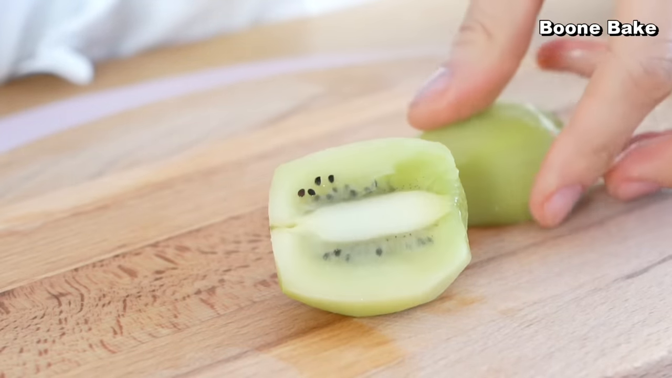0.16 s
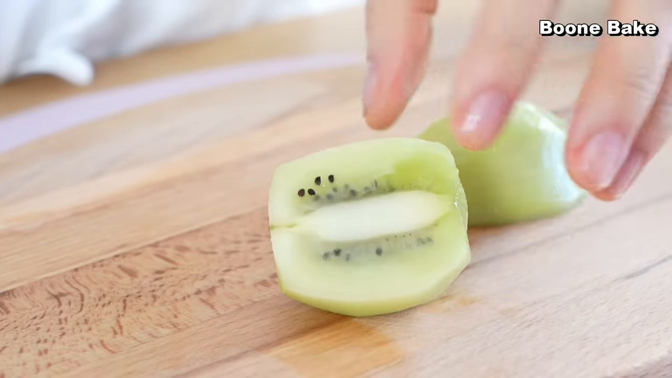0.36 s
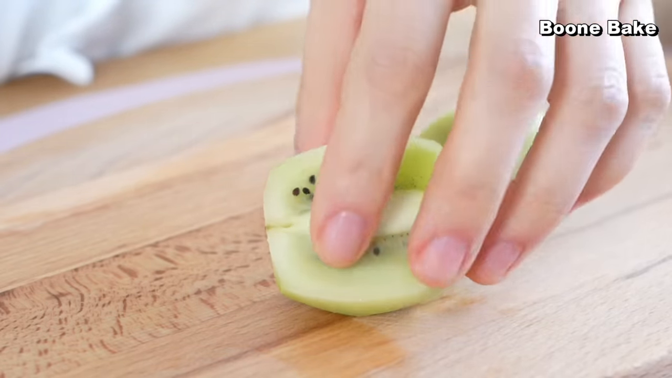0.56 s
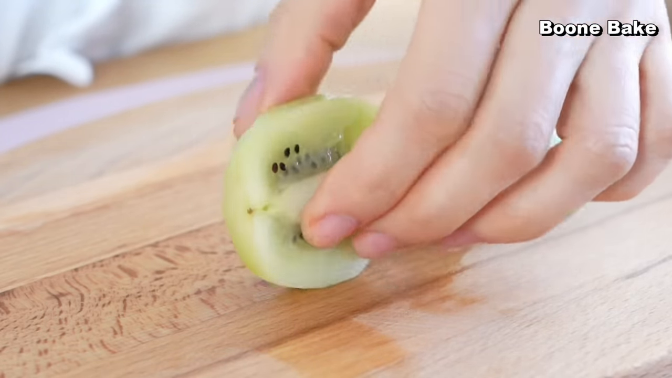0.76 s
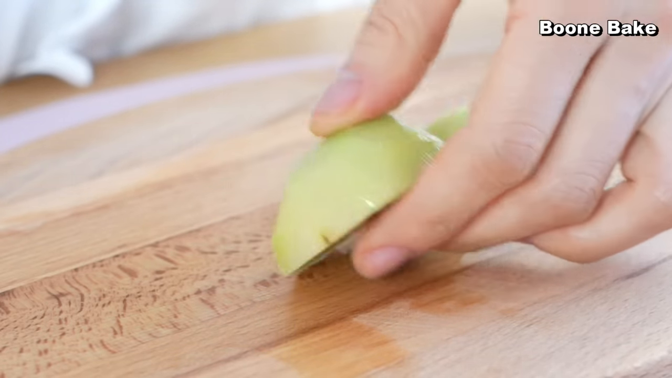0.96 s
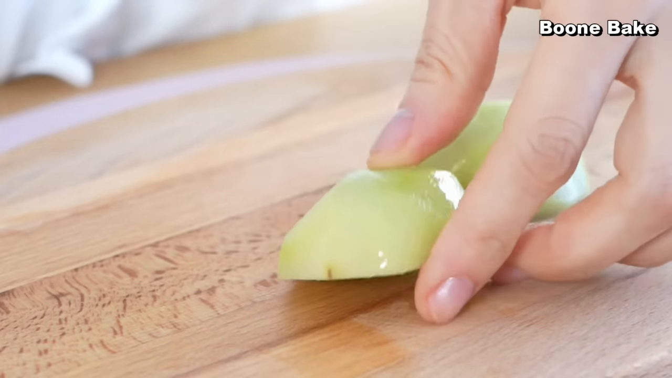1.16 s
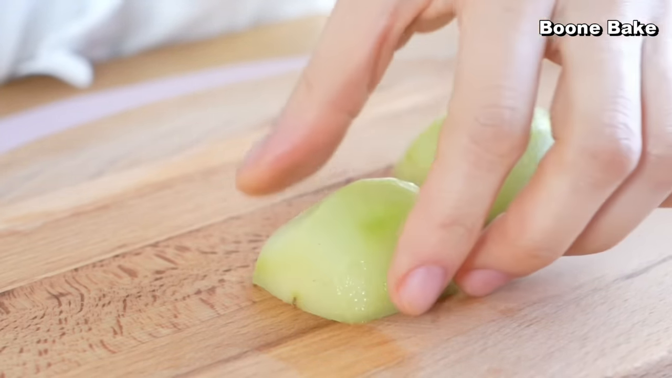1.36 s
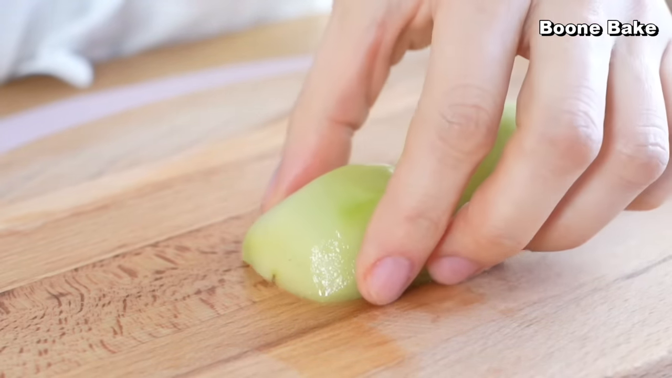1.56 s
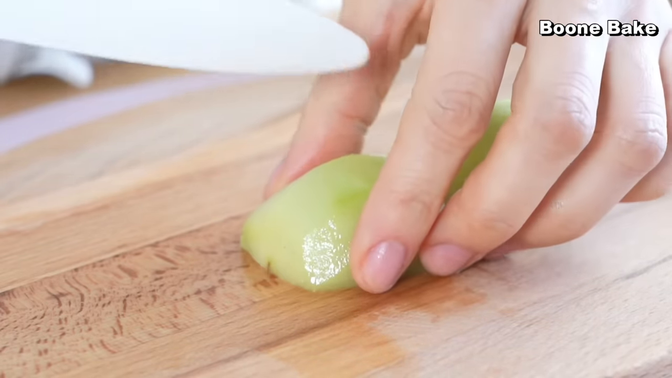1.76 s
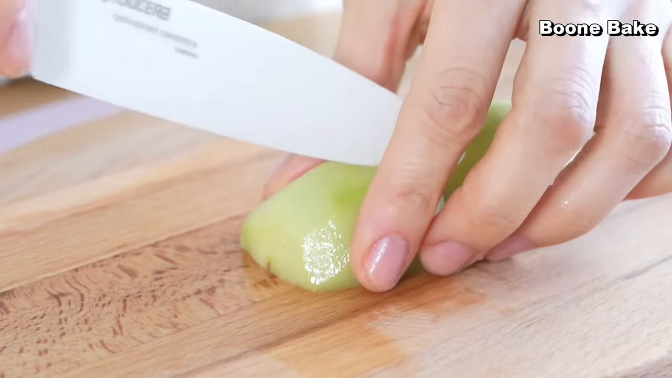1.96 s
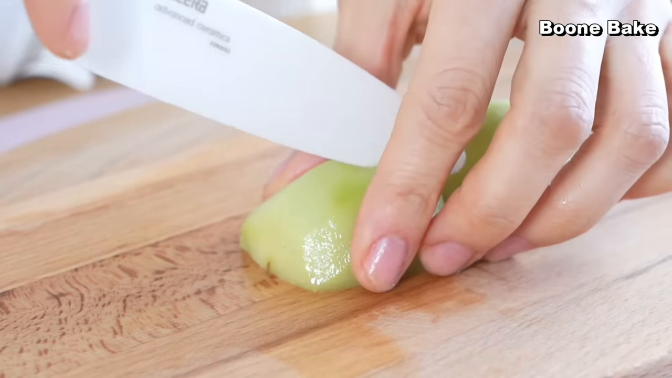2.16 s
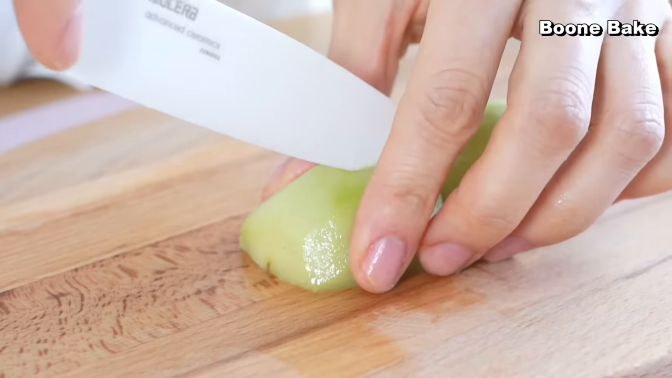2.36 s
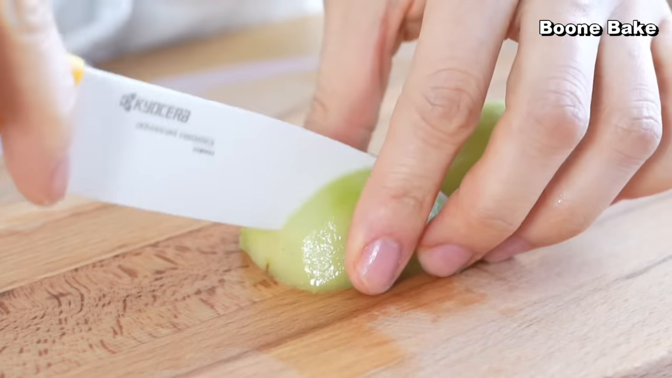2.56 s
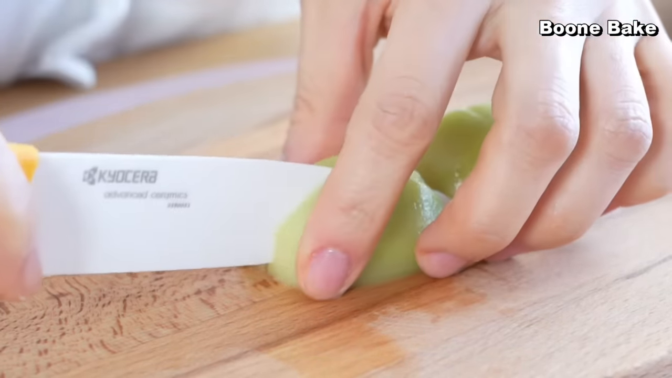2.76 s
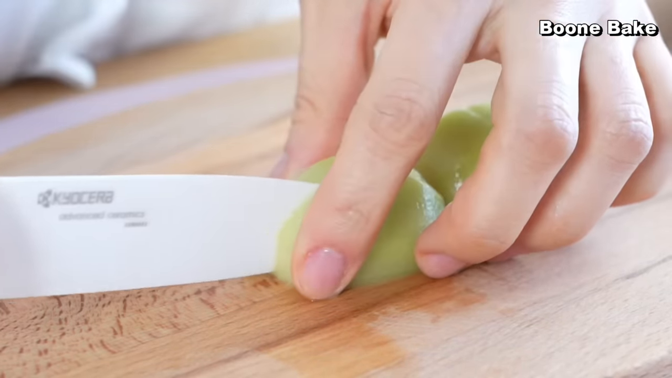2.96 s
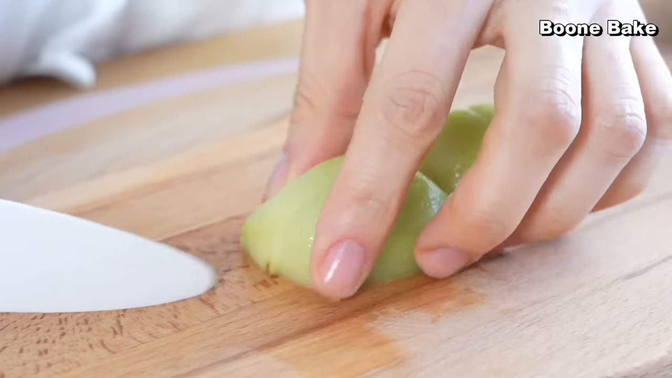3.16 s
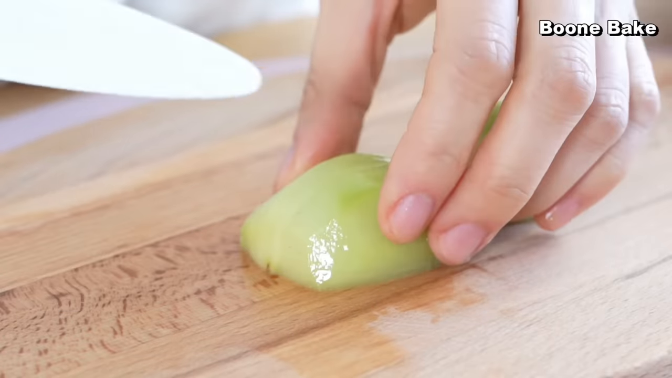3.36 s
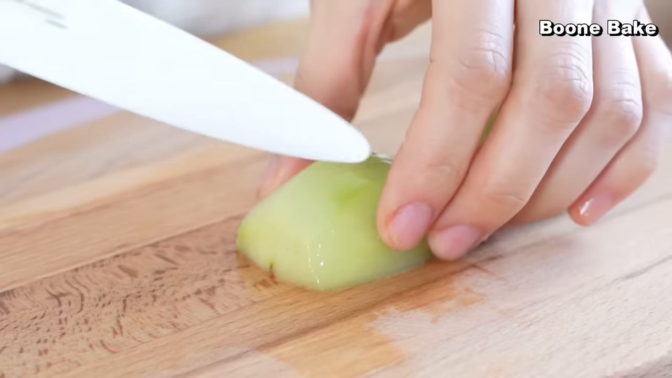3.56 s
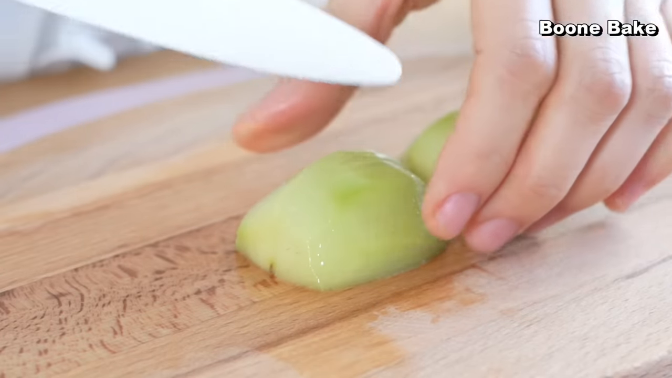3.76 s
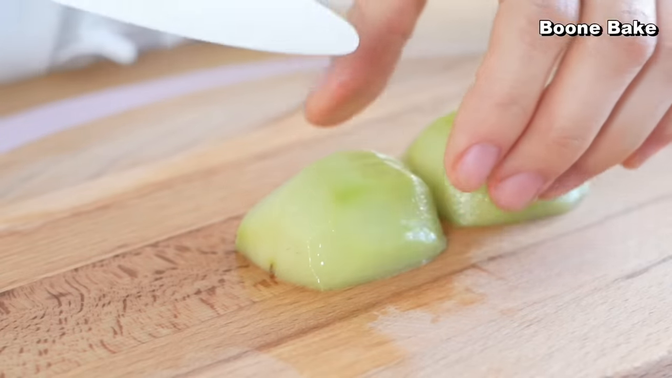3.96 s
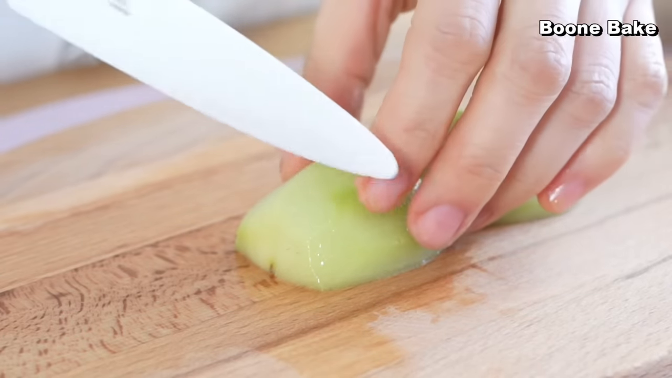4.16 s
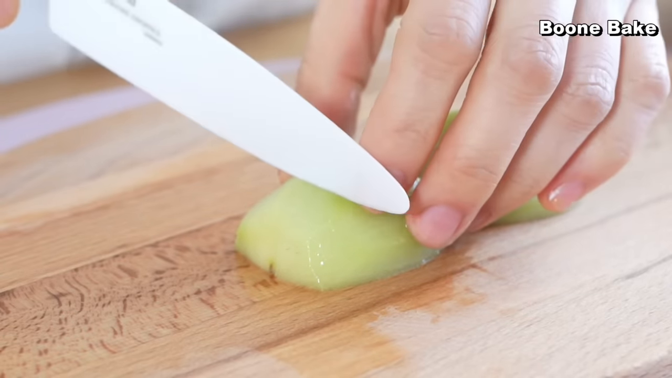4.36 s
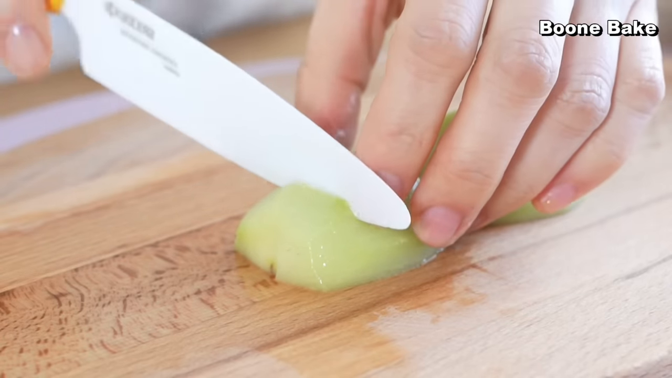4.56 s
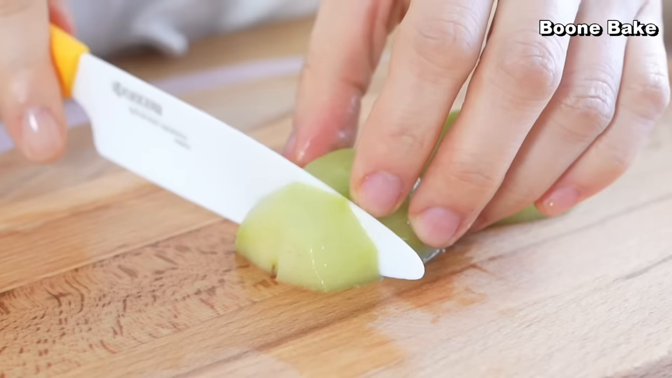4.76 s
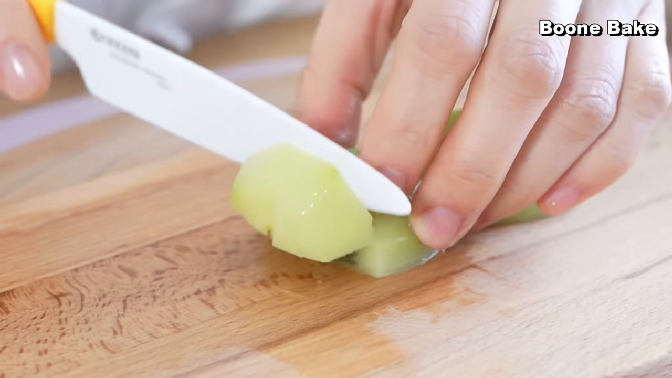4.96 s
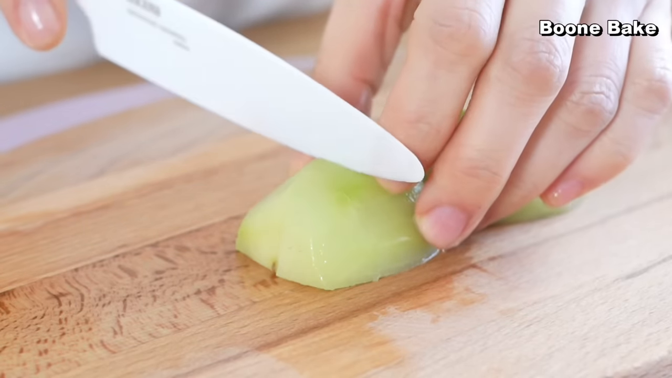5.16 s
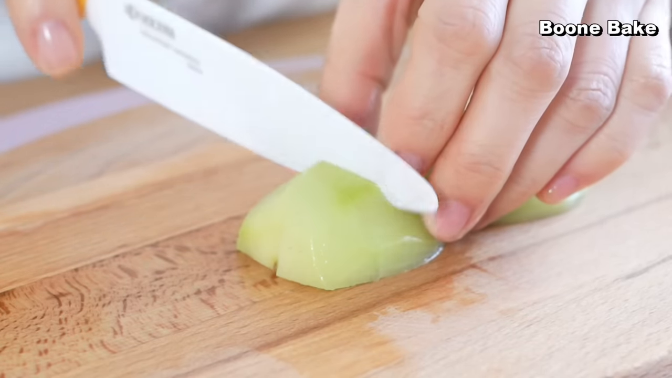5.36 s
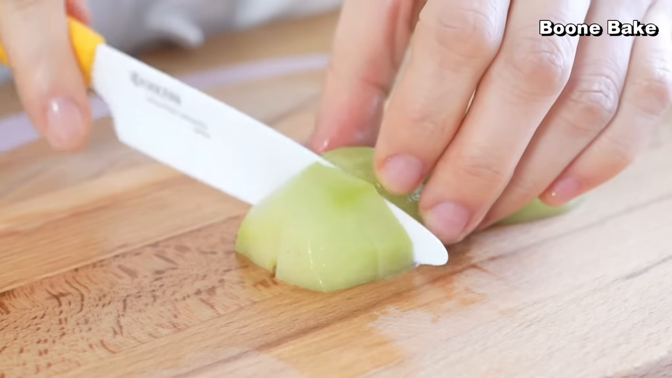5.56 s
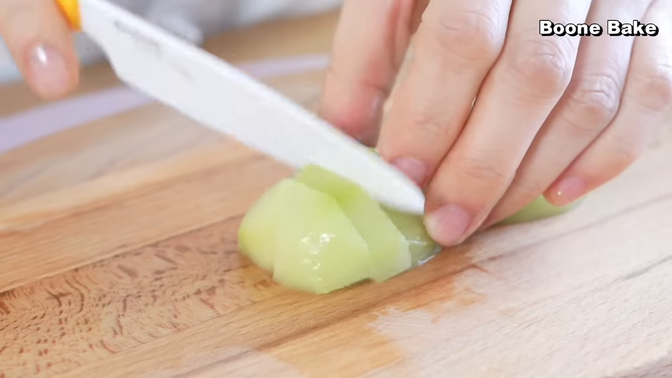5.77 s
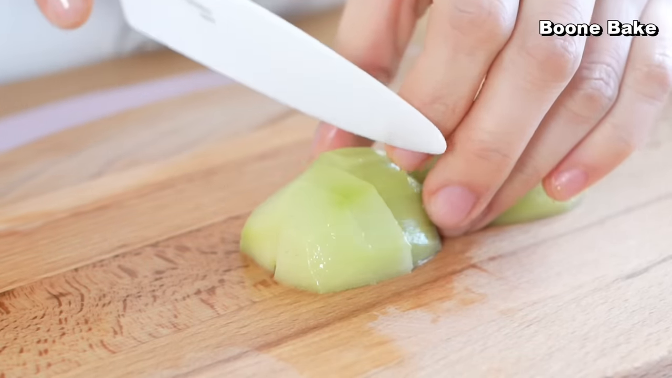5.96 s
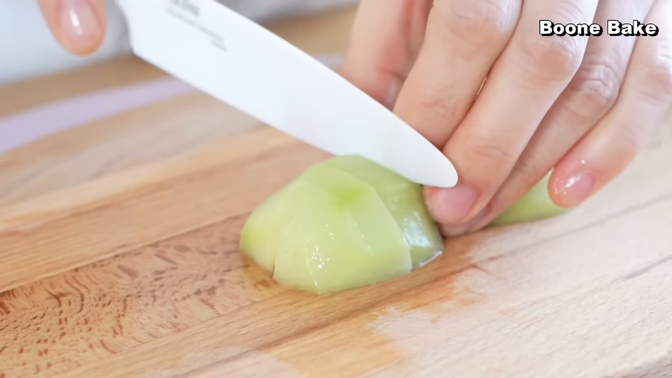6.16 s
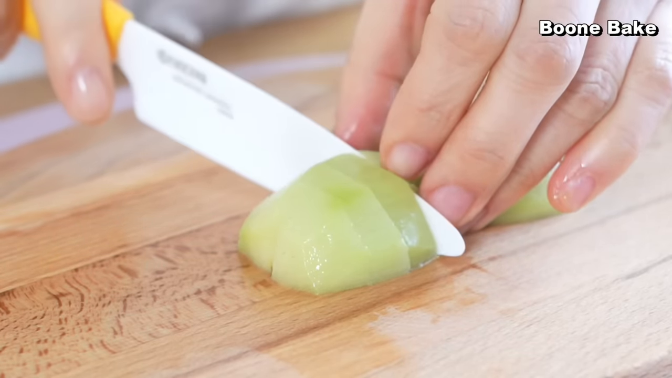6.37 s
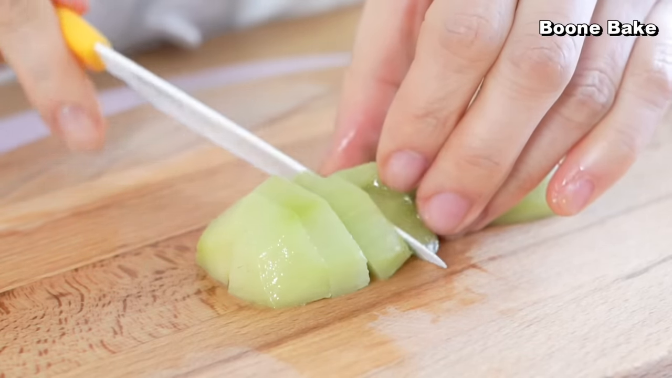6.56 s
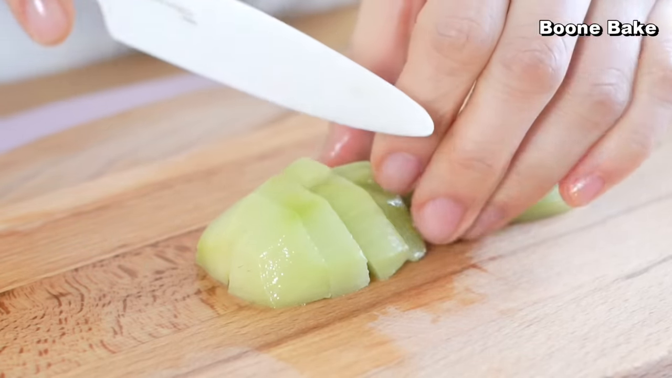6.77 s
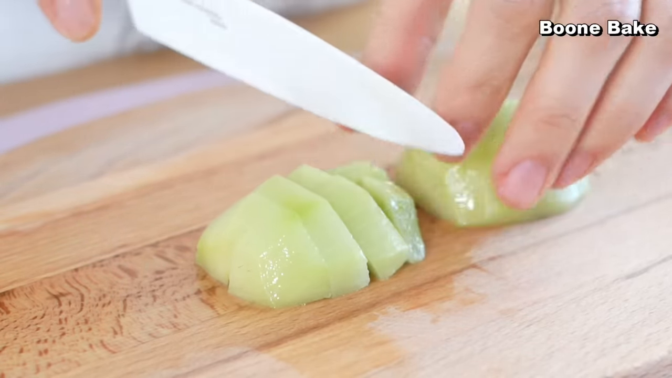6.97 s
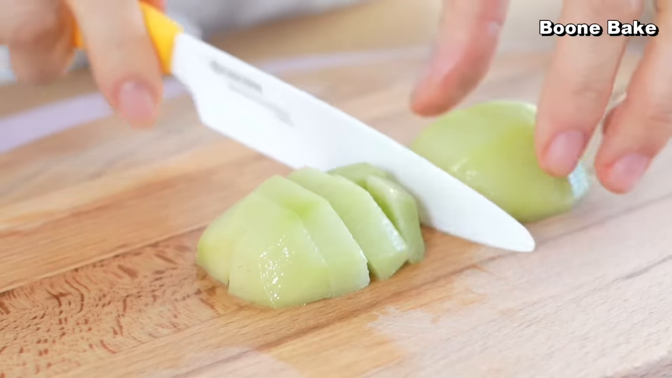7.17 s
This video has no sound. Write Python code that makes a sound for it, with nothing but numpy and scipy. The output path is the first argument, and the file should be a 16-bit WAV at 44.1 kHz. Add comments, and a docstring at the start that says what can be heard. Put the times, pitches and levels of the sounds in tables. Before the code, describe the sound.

In a quiet kitchen with a slight echo, fingers rub a peeled kiwi and two pieces flop onto a wooden board with small sticky clicks. A ceramic knife crunches through the flesh and knocks on the wood, then drags out with a rasp and a squeak. Three more cuts follow, each ending in a sharp knock and a brief chatter of the blade. One last knock comes at the end.

```python
"""In a quiet kitchen with a slight echo, fingers rub a peeled kiwi and two pieces flop onto a wooden board,
with clicks of juice and a faint squeak. At 2.5 s a ceramic knife crunches through the flesh, knocks on the
board and sets the table swaying. The blade is then dragged out along the wood, rasping and squeaking. Three
more cuts follow (4.7, 5.5 and 6.4 s); after each, the blade chatters as it lifts off the board. Near the end
the background noise suddenly drops."""
import sys
import numpy as np
from scipy import signal
from scipy.fft import rfft, irfft
from scipy.io import wavfile
from scipy.ndimage import uniform_filter1d

SR = 44100
rng = np.random.default_rng(int(sys.argv[2]) if len(sys.argv) > 2 else 0)


def transcribe(u):
    """Save the signal u as a 16-bit wav file named by the first command-line argument.

    u: samples, shape (n,) or (channels, n), limited to [-1, 1]; the rate is SR.
    q: integer samples, one column per channel.
    """
    v = np.clip(np.atleast_2d(u).T, -1, 1)
    q = np.round(v * 32767).astype(np.int16)
    wavfile.write(sys.argv[1], SR, q)


N = 318402
TIME = np.arange(N) / SR

# A TONE table says how strong each pitch is next to the others. ring_s is the time to fade by 60 dB.
# room noise: pitch_hz, level_db
ROOM_TONE = [(12, -18.5), (20, 3.5), (32, -4), (49, -9.5), (85, -11.5), (167, -13.5), (247, -17.5),
             (365, -17.5), (456, -20.5), (539, -21.5), (674, -21.5), (2000, -30), (3800, -31.5),
             (13700, -39), (15800, -41)]
# fingers slide on the fruit: middle_s, half_length_s, level_db
FINGER_RUBS = [(0.0, 0.021, -55), (0.113, 0.037, -57.5), (1.162, 0.033, -58.5), (1.91, 0.12, -65),
               (3.412, .02, -64), (3.587, .11, -64), (3.89, 0.2, -65)]
# fingers on wet flesh: pitch_hz, level_db
RUB_TONE = [(500, -16), (1100, 12.5), (1700, 5.5), (2300, 5), (2800, 1.5), (3400, 7.5), (4300, 3.5),
            (6000, 1), (10000, -9), (16000, -26)]
# fruit flops or is pressed onto the board: start_s, thud_db, slap_db
FRUIT_THUDS = [(.165, -17, -35), (1.276, -18.5, -35), (1.458, -43, -65), (4.318, -40.5, -70),
               (4.724, -40, -51), (5.1492, -29.5, -58), (5.197, -38, -57.5), (6.064, -42.5, -70),
               (6.35, -29, -52)]
# notes the board rings with: pitch_hz, level_db, ring_s
BOARD_NOTES = [(138, -9, 0.052), (317, -9, 0.028), (645, -10, 0.0093), (750, -13.5, 0.019),
               (1020, 7.5, 0.016), (1358, -8, 0.025), (1530, -14.5, .013), (2162, -3.5, 0.051),
               (2780, -16, 0.026), (4370, -22, .013)]
# wet fruit slaps the wood: pitch_hz, level_db
SLAP_TONE = [(150, -2.5), (420, -2.5), (720, -28), (980, 9), (1250, -15), (1800, -3.5), (2600, -25.5),
             (9000, -36.5)]
# sticky clicks of juice: start_s, snap_db, pop_above_snap_db
JUICE_SMACKS = [(0.166, -39, 2.5), (1.2764, -33, -2), (2.1845, -46, 3), (2.388, -45, -6.5),
                (2.698, -44, -13), (4.4763, -41, -5), (5.1495, -35, -14), (5.1995, -43.5, -9),
                (6.067, -45, -16), (6.145, -47, -14.5), (6.19, -41, -17), (6.5225, -41.5, -15.5),
                (6.545, -41, -5.5), (6.6952, -56, -16)]
# a film of juice snaps: pitch_hz, level_db
SNAP_TONE = [(800, -50.5), (2000, -5.5), (4200, 5.5), (7300, 0.5), (8700, 10), (10000, -12), (16000, -2)]
# a pocket of juice pops: pitch_hz, level_db
POP_TONE = [(700, -23.5), (1600, 10), (2200, 0.5), (3200, 0.5), (4500, -15), (9000, -37)]
# wet flesh or the blade squeaks: middle_s, pitch_hz, half_length_s, level_db
SHORT_SQUEAKS = [(1.165, 2180, 0.032, -61), (1.175, 3430, .025, -67), (3.042, 1050, 0.014, -48),
                 (3.17, 8460, 0.019, -43), (3.217, 6300, .016, -50), (3.21, 14500, 0.027, -53),
                 (4.942, 3340, 0.0025, -38.5)]
# knife strokes: landing_s, bite_in_s, full_depth_for_s, crunch_db, rumble_start_db, sway_db, sway_fade_s
KNIFE_CUTS = [(2.527, 0.07, 0.039, -48, -43, -36.5, 0.67), (4.727, .13, 0.055, -43.5, -38.5, -35.5, .55),
              (5.506, 0.09, 0.061, -43.5, -38.5, -33, .28), (6.353, 0.051, 0.057, -42, -39.5, -30.5, .12)]
# the fruit's cells burst: pitch_hz, level_db
CRUNCH_TONE = [(300, -8), (500, -14.5), (730, 4), (1020, 5.5), (1550, 1), (2100, -2.5), (2800, -5.5),
               (3900, -2.5), (7700, -10.5), (8700, -3), (10300, -18), (13200, -10), (16000, -18)]
# the board shakes under a cut: pitch_hz, level_db
RUMBLE_TONE = [(35, -23), (70, -8.5), (135, -1.5), (290, -8), (450, -21.5), (900, -46.5)]
# the blade lands: start_s, strength_db, contact_ms, click_offset_db, second_touch_after_s
KNIFE_KNOCKS = [(2.527, -16, 1, -8, 0.0021), (4.727, -9, 0.54, -14, 0.0011),
                (5.5068, -5, 0.35, -11, 0.00113), (6.353, -11, 0.46, -16, 0.0012),
                (7.163, -11.5, 0.28, -4.5, 0.00075)]
# the edge clicks on the wood: pitch_hz, level_db
CLICK_TONE = [(300, -19.5), (550, 2), (900, -23), (1400, 16), (2300, 6.5), (3200, -3.5), (4600, -5.5),
              (7000, -22.5), (16000, -33.5)]
# two ways the table rocks, which together make a throb: pitch_hz, level_db
TABLE_NOTES = [(22.4, 0), (27, -10.5)]
# ringing of the dragged blade: pitch_hz, width_hz, level_db
RASP_PEAKS = [(1016, 102, 1.5), (2060, 420, -7), (4040, 520, -9), (6500, 880, -13), (9000, 1190, -19),
              (13300, 900, -27)]
# the tip scratches the wood: pitch_hz, level_db
TIP_TONE = [(100, 7.5), (700, -0.5), (1700, -1), (2700, -5), (5400, -1.5), (6200, 3.5), (7400, -9),
            (8600, -2), (9400, -4.5), (11200, -13.5), (14500, -7), (16000, -19)]
# the edge catches on the wood as it lifts: start_s, strength_db, lowest_hz
BLADE_CATCHES = [(4.8525, -22, 2500), (4.857, -6.5, 1290), (4.8598, -12.5, 1390), (4.943, -27, 2590),
                 (5.6479, -14.5, 1960), (5.652, -10.5, 2400), (6.4629, -21.5, 1300)]
# ringing of the blade as it catches: pitch_hz, width_hz, level_db
BLADE_PEAKS = [(1585, 590, 2), (3570, 270, 1.5), (4100, 220, 0), (4760, 270, 1), (5660, 950, -2.5),
               (6540, 420, 1.5), (7800, 690, -4), (8960, 320, -1.5), (13000, 620, -26)]
# the kitchen's echo: pitch_hz, level_db
ECHO_TONE = [(60, -12.5), (150, -12.5), (300, -5), (480, -4), (680, 0.5), (1020, -6), (1250, -1.5),
             (1800, -7), (2500, -2.5), (3500, -9), (7000, -7.5), (15000, -12.5)]
# how long the echo lasts: pitch_hz, ring_s
ECHO_TIMES = [(100, 0.65), (500, 0.52), (1200, 0.53), (3000, 0.34), (7000, 0.48), (15000, 0.31)]
# notes that linger between the walls (standing waves): pitch_hz, level_db, ring_s
KITCHEN_NOTES = [(113.6, -69, 0.12), (142.34, -64.5, 0.49), (179, -59.5, 0.43), (272.5, -61, 0.78),
                 (392.4, -55, 0.3), (494, -56, .35), (645, -51, 0.21), (691.5, -45.5, 0.66),
                 (953, -67.5, 0.14), (972, -69.5, 0.3), (1192, -62.5, 0.21), (1232, -55.5, 0.49)]


def from_db(db):
    """Turn decibels into a number to multiply by."""
    return 10 ** (np.asarray(db) / 20)


def rms_one(x):
    """Scale a sound so its average level (rms) is 1."""
    return x / np.sqrt(np.mean(x ** 2) + 1e-20)


def peak_one(x):
    """Scale a sound so its peak is 1."""
    return x / np.abs(x).max()


def level_out(x, span_s):
    """Hold the level of a noise near 1, averaged over span_s."""
    return x / np.sqrt(uniform_filter1d(x ** 2, int(span_s * SR)) + 1e-12)


def at_hz(table, hz):
    """Read between a table's rows, with octaves evenly spaced."""
    pitches, values = np.transpose(table)
    return np.interp(np.log(hz + 1e-3), np.log(pitches), values)


def add(track, start_s, sound):
    """Mix a sound into a track at a given time."""
    i = int(np.clip(round(start_s * SR), 0, N - 1))
    track[i:i + len(sound)] += sound[:N - i]


def colour(x, tone):
    """Filter a sound so it takes on a TONE table."""
    size = 2 ** 13
    gains = from_db(at_hz(tone, np.arange(size // 2 + 1) * SR / size))
    # fold the filter so it never sounds ahead of its input (minimum phase)
    cepstrum = irfft(np.log(gains))
    cepstrum[1:size // 2] *= 2
    cepstrum[size // 2 + 1:] = 0
    response = irfft(np.exp(rfft(cepstrum)))[:size // 2]
    return signal.fftconvolve(x, response)[:len(x)]


def cut_bass(x, lowest_hz):
    """Weaken everything below lowest_hz."""
    return signal.sosfilt(signal.butter(2, lowest_hz, "high", fs=SR, output="sos"), x)


def resonate(x, peaks):
    """Make a sound ring at each peak; every other peak is flipped."""
    out = 0
    for k, (hz, width_hz, db) in enumerate(peaks):
        ring = signal.lfilter(*signal.iirpeak(hz, hz / width_hz, fs=SR), x + 1e-18)
        out += (-1) ** k * from_db(db) * ring
    return out


def ringing(notes):
    """Fading notes after one blow; neighbours swing in opposite directions."""
    t = TIME[:SR // 2]
    return sum((-1) ** k * from_db(db - 60 * t / ring_s) * np.cos(2 * np.pi * hz * t)
               for k, (hz, db, ring_s) in enumerate(notes))


def grains(per_s, spread_db):
    """Random clicks; spread_db makes their sizes uneven."""
    sizes = from_db(spread_db * np.minimum(rng.exponential(1, N), 4))
    return (rng.random(N) < per_s / SR) * sizes * rng.choice([-1, 1], N)


def burst(tone, decay_s):
    """A short crackle that dies away; peak 1."""
    t = TIME[:SR // 20]
    return peak_one(colour(rng.standard_normal(len(t)) * np.exp(-t / decay_s), tone))


def envelope(start_s, end_s, rise_s, fade_s):
    """Full volume from start to end; rise_s and fade_s are the times to move by 20 dB."""
    away = np.maximum(start_s - TIME, 0) / rise_s + np.maximum(TIME - end_s, 0) / fade_s
    return from_db(-20 * np.minimum(away, 10))


def room_noise(level_db=-55, drop_at_s=6.637, drop_db=10.5, drop_takes_s=0.0058):
    """Soft steady background noise, whose level drops near the end."""
    dropped = np.clip((TIME - drop_at_s) / drop_takes_s, 0, 1)
    return from_db(level_db - drop_db * dropped) * rms_one(colour(rng.standard_normal(N), ROOM_TONE))


def finger_rubs():
    """Fingertips slip on wet flesh; each slide swells and fades."""
    slides = sum(from_db(db) * np.exp(-((TIME - middle_s) / half_s) ** 2)
                 for middle_s, half_s, db in FINGER_RUBS)
    return slides * rms_one(colour(grains(per_s=4900, spread_db=0), RUB_TONE))


def board_hit(contact_ms):
    """The board rings after one touch: the longer the touch, the duller the sound. Peak 1."""
    progress = 1000 * TIME[:SR // 20] / contact_ms
    force = progress * np.exp(-4 * progress)
    wave = signal.fftconvolve(ringing(BOARD_NOTES)[:SR // 8], force)
    return peak_one(cut_bass(wave, lowest_hz=73))   # the board is too small to give off deep bass


def fruit_thuds():
    """Soft flesh stirs only the board's lowest notes; its wet face adds a small slap."""
    out = np.zeros(N)
    slap = peak_one(colour(signal.unit_impulse(SR // 20), SLAP_TONE))
    for start_s, thud_db, slap_db in FRUIT_THUDS:
        add(out, start_s, from_db(thud_db) * board_hit(contact_ms=8))
        add(out, start_s + 0.001447, from_db(slap_db) * slap)
    return out


def juice_smacks():
    """Films of juice snap; larger pockets pop lower."""
    out = np.zeros(N)
    for start_s, snap_db, pop_above_db in JUICE_SMACKS:
        add(out, start_s, from_db(snap_db) * burst(SNAP_TONE, decay_s=0.0018))
        add(out, start_s, from_db(snap_db + pop_above_db) * burst(POP_TONE, decay_s=0.0015))
    return out


def squeaks():
    """Flesh or blade sticks and slips, singing for a moment around one pitch."""
    out = np.zeros(N)
    t = TIME[:SR // 5] - 0.1   # time from the middle of a squeak
    for middle_s, hz, half_s, db in SHORT_SQUEAKS:
        note = signal.lfilter(*signal.iirpeak(hz, Q=30, fs=SR), rng.standard_normal(len(t)))
        swell = np.exp(-(t / half_s) ** 2)
        add(out, middle_s + t[0], from_db(db) * swell * level_out(note, span_s=0.023))
    return out


def pressing(start_s, end_s, db_per_s):
    """Volume that grows steadily while the hand bears down."""
    return from_db(db_per_s * (np.clip(TIME, start_s, end_s) - start_s))


def wobble(spread_db, per_s=110):
    """Volume that wanders at random as the blade sticks and gives."""
    points = rng.standard_normal(N // 20)
    return from_db(spread_db * np.interp(TIME * per_s, np.arange(len(points)), points))


def knife_cuts(rumble_lead_s=0.015):
    """Cells burst under the edge, and the tearing shakes the board more and more until the blade lands."""
    crunch = rumble = 0
    for landing_s, bite_s, deep_s, crunch_db, rumble_db, _, _ in KNIFE_CUTS:
        sunk_s = landing_s - deep_s
        crunch += from_db(crunch_db) * envelope(sunk_s, landing_s, rise_s=bite_s, fade_s=0.016)
        loaded_s = sunk_s - rumble_lead_s   # the board takes the load a little before the cells burst
        load = envelope(loaded_s, landing_s, rise_s=0.74 * bite_s, fade_s=0.04)
        rumble += from_db(rumble_db) * load * pressing(loaded_s, landing_s, db_per_s=37.5)
    cells = level_out(colour(grains(per_s=4600, spread_db=4.5), CRUNCH_TONE), span_s=0.09)
    board = level_out(colour(rng.standard_normal(N), RUMBLE_TONE), span_s=0.013)
    return crunch * wobble(spread_db=1.4) * cells + rumble * board


def knife_knocks():
    """The hard edge hits the wood with a click and settles with a softer touch 1 or 2 ms later."""
    out = np.zeros(N)
    for start_s, db, contact_ms, click_db, settle_s in KNIFE_KNOCKS:
        hit = board_hit(contact_ms)
        add(out, start_s, from_db(db - 5) * hit)
        add(out, start_s + settle_s, from_db(db - 17) * hit)
        add(out, start_s, from_db(db + click_db - 2) * burst(CLICK_TONE, decay_s=0.0026))
    return out


def table_sway(delay_s=0.097, hold_s=0.16):
    """After each cut the table rocks at very low pitches, and keeps on while the hand leans on it."""
    out = 0
    for landing_s, *_, sway_db, fade_s in KNIFE_CUTS:
        full_s = landing_s + delay_s
        swell = envelope(full_s, full_s + hold_s, rise_s=0.064, fade_s=fade_s)
        rocking = sum(from_db(db) * np.sin(2 * np.pi * hz * (TIME - landing_s)) for hz, db in TABLE_NOTES)
        out += from_db(sway_db) * swell * rocking
    return out


def blade_drag(onto_tip_s=3.116, lift_off_s=3.232, rasp_db=-45.5, tip_start_db=-45):
    """The long edge rasps over the wood and rings the blade, then the tip scratches brighter and lifts."""
    rasp = level_out(resonate(grains(per_s=3500, spread_db=1.5), RASP_PEAKS), span_s=0.039)
    scratch = level_out(colour(grains(per_s=5000, spread_db=3), TIP_TONE), span_s=0.014)
    rasp *= from_db(rasp_db) * envelope(onto_tip_s - 0.1, onto_tip_s, rise_s=0.12, fade_s=0.2)
    scratch *= from_db(tip_start_db) * envelope(onto_tip_s, lift_off_s, rise_s=0.11, fade_s=0.02)
    scratch *= pressing(onto_tip_s, lift_off_s, db_per_s=34)
    return wobble(spread_db=1.76) * (rasp + scratch)


def blade_chatter(decay_s=0.0018):
    """The lifting edge catches on the wood; each tiny slip rings the ceramic blade."""
    slips, t = np.zeros(N), TIME[:SR // 20]
    for start_s, db, lowest_hz in BLADE_CATCHES:
        slip = rng.choice([-1, 1], len(t)) * np.exp(-t / decay_s)
        add(slips, start_s, from_db(db) * cut_bass(slip / np.linalg.norm(slip), lowest_hz))
    return from_db(-4) * slips + from_db(12) * resonate(slips, BLADE_PEAKS)


def kitchen_echo(x, build_up_s=0.0016):
    """The walls return a smooth echo, each pitch band fading at its own pace, and a few lingering notes."""
    t = TIME[:SR]
    noise_spectrum, hz = rfft(rng.standard_normal(SR)), np.arange(SR // 2 + 1)
    centres_hz = np.geomspace(60, 15000, 9)
    tail = 0
    for centre_hz, share in zip(centres_hz, np.eye(len(centres_hz))):
        band = irfft(noise_spectrum * at_hz(np.c_[centres_hz, share], hz), SR)
        tail += band * from_db(-60 * t / at_hz(ECHO_TIMES, centre_hz))
    tail *= 1 - np.exp(-(t / build_up_s) ** 2)
    tail = from_db(-0.5) * colour(tail / np.linalg.norm(tail), ECHO_TONE)
    add(tail, 0.003, ringing(KITCHEN_NOTES))
    return signal.fftconvolve(x, tail)[:N]


def scene():
    """All the work on the board, heard in the kitchen; one channel."""
    fruit = finger_rubs() + fruit_thuds() + juice_smacks() + squeaks()
    knife = knife_cuts() + knife_knocks() + blade_drag() + blade_chatter()
    work = fruit + knife
    return (room_noise() + work + table_sway() + kitchen_echo(work))[None]


def record(dry, cutoff_hz=15750):
    """Cut off the very highest treble steeply."""
    return signal.sosfilt(signal.ellip(10, 0.1, 70, cutoff_hz, fs=SR, output="sos"), dry)


dry = scene()
out = record(dry)
transcribe(out)
```